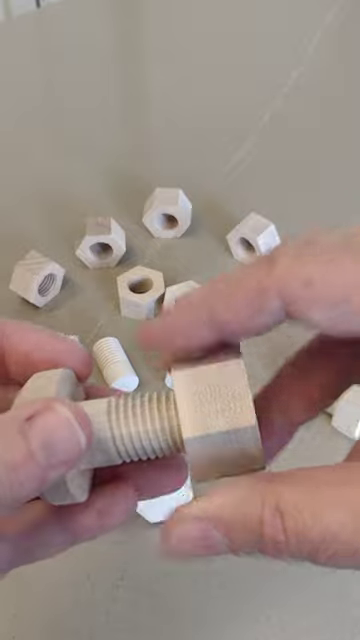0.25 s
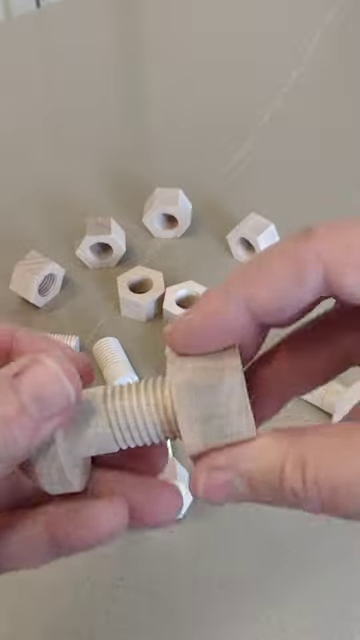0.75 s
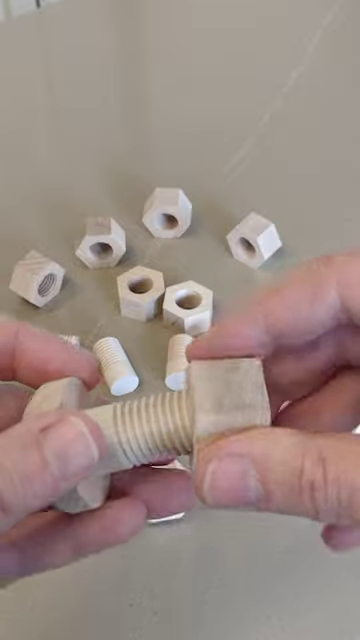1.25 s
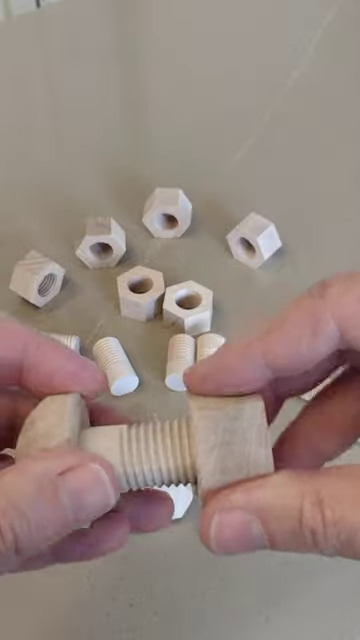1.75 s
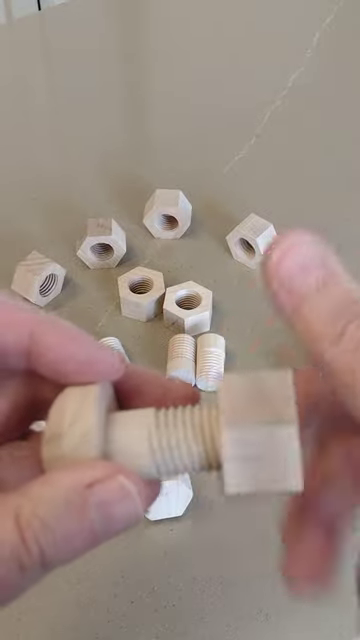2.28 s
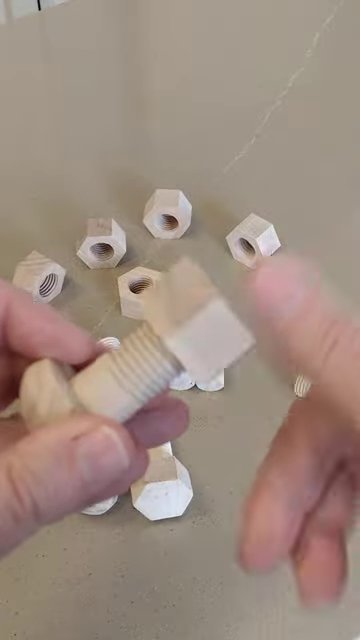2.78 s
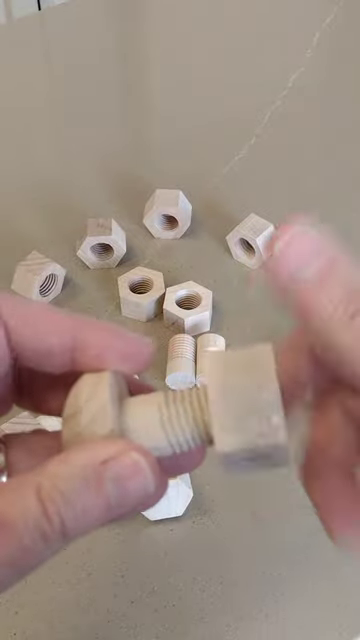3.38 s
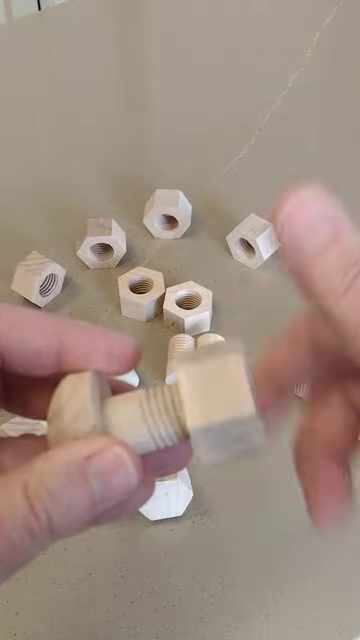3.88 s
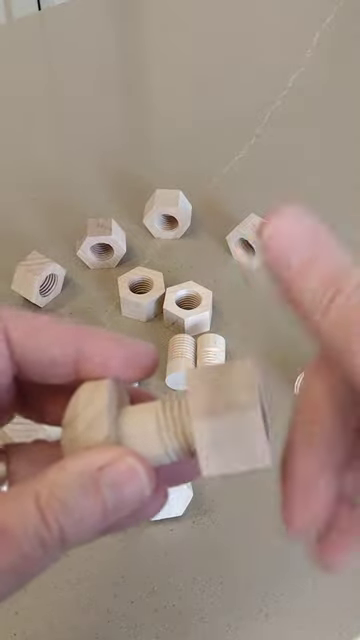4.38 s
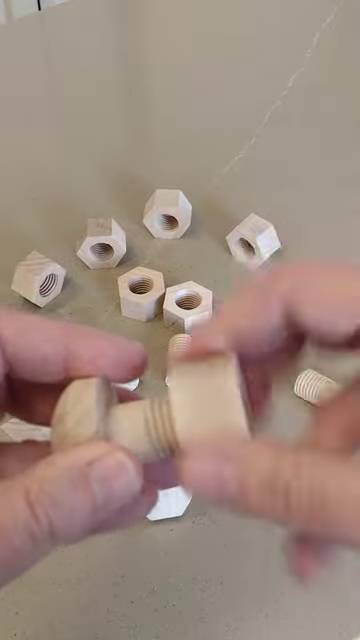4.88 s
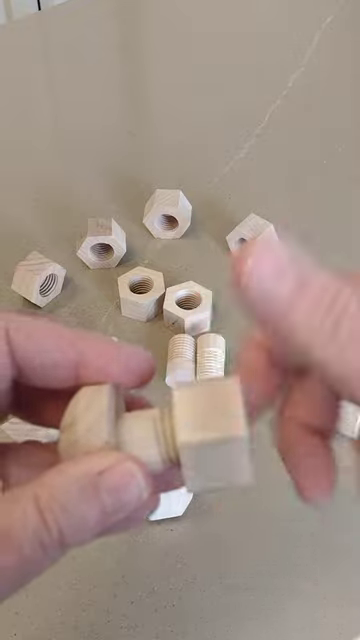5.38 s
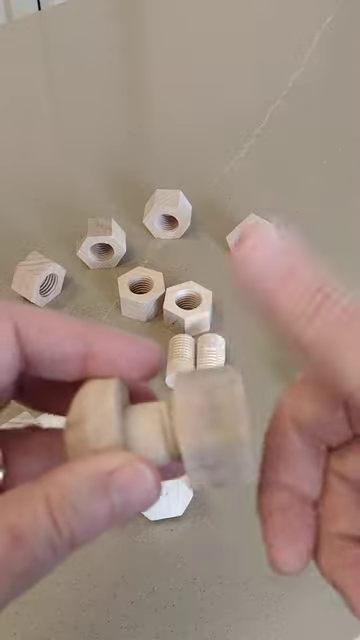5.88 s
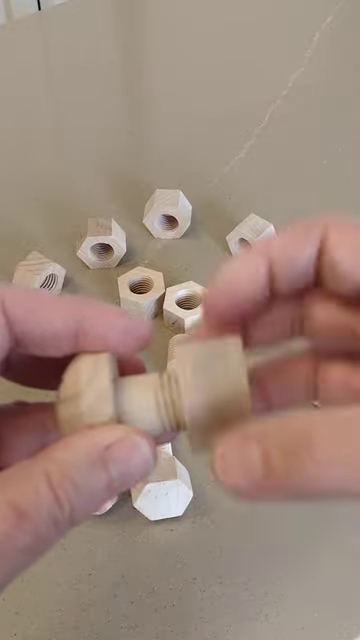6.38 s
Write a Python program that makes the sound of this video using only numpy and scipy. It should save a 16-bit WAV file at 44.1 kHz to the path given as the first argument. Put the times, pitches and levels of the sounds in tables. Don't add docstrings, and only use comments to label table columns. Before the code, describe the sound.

Soft finger rubs on wood give way to sharp, irregular wooden clacks and a tiny thread squeak, close up, with quiet motor hum.

```python
import sys
import numpy as np
from scipy import signal
from scipy.fft import rfft, irfft
from scipy.io import wavfile
from scipy.ndimage import uniform_filter1d

SR = 44100
rng = np.random.default_rng(int(sys.argv[2]) if len(sys.argv) > 2 else 0)


def dump(signal):
    limited = np.clip(np.atleast_2d(signal).T, -1, 1)
    pcm = np.round(limited * 32767).astype(np.int16)
    wavfile.write(sys.argv[1], SR, pcm)


def boost_factor(decibels):
    exponent = np.asarray(decibels, float) / 20
    return 10 ** exponent


N = 293265

# pitch_hz, density_db (per Hz)
AIR_SPECTRUM = [(15, -53.5), (25, -17.5), (64, -12), (112, -2.5), (174, -9.5), (275, -5.5), (416, -12),
                (570, -20), (628, -16), (1500, -22), (3590, -24), (7430, -31), (8190, -21), (10600, -63),
                (18000, -120)]
# pitch_hz, level_db (rms)
HUM_TONES = [(120, -74.5), (237, -80.5), (274, -78), (296, -82.5), (355, -79.5), (415, -78.5), (474, -85),
             (533, -90), (637, -87.5), (950, -88)]
RUMBLE_DB, HISS_DB = -75, -76
RUMBLE_LOW_HZ, SPLIT_HZ = 36.2, 493
OPEN_FROM_DB, OPEN_SLOPE, OPEN_MOST_DB, OPEN_HOLD_S = -64.5, 0.14, 7, 0.067

# pitch_hz, t60_s, level_db
ROOM_BANDS = [(700, 0.43, -9.5), (1200, 0.26, 1.5), (2000, 0.27, -2.5), (3240, 0.17, -2.5),
              (4470, 0.22, -1.5), (5560, 0.33, 2), (8050, 0.063, -12)]
ROOM_DB, ROOM_RISE_S, ROOM_GAP_S = -16, 0.021, 0.001
LATE_DB, LATE_STRETCH = -18, 4.66
ECHO_SPREAD_DB, ECHO_RATE_HZ = 2.5, 200

# start_s, length_s, first_hz, last_hz, level_db
CHIRPS_OF_THREAD = [(0.075, .03, 1930, 2455, -68), (0.169, .04, 2480, 2530, -63),
                    (0.28, 0.05, 3240, 3370, -65.5), (0.506, 0.034, 3330, 3370, -67.5),
                    (1.125, 0.035, 1630, 1750, -68), (2.044, 0.044, 2260, 2480, -62.5),
                    (2.269, 0.02, 1100, 1290, -57), (2.845, 0.024, 1906, 2200, -53),
                    (3.175, .03, 1200, 1200, -57), (4.776, 0.34, 1288, 1313, -64),
                    (6.04, 0.029, 925, 1180, -58), (6.074, 0.01, 1660, 1780, -50)]
# start_s, length_s, first_hz, last_hz, level_db
FIBRE_WHISTLES = [
    (2.568, 0.014, 1610, 934, -45),
    (2.5712, 0.013, 2370, 2405, -26),
    (3.377, .015, 2490, 2200, -38.5),
    (2.087, 0.018, 2450, 2000, -62),
    (2.868, 0.033, 2450, 2590, -54.5),
    (4.739, 0.027, 2504, 2510, -50),
    (5.871, 0.039, 2370, 2370, -61.5),
    (5.92, 0.039, 2367, 2370, -66),
]
CHIRP_ROUGH, WHISTLE_ROUGH = 0.75, 0.15

# time_s, slips_per_s, level_db, overtone_loss_db
SQUEAK_PATH = [
    (3.6241, 2430, -65, 27),
    (3.627, 2050, -34.5, 37),
    (3.632, 2000, -30, 22),
    (3.636, 1810, -26.5, 2),
    (3.638, 1270, -33.5, -2.5),
    (3.643, 1120, -38, -5),
    (3.648, 760, -58, -16.5),
    (3.656, 1120, -48.5, -2),
]
SQUEAK_ROUGH_DB = 2.5

# start_s, length_s, wood_db, skin_hiss_db
FINGER_RUBS = [(0.076, 0.022, -76, -74), (0.145, 0.069, -76, -72.5), (0.518, 0.017, -90, -81),
               (0.547, 0.11, -75, -72), (0.67, 0.12, -75.5, -70.5), (0.77, 0.16, -83, -78),
               (1.025, 0.296, -82.5, -77), (1.427, 0.07, -80, -72.5), (1.677, 0.07, -77.5, -74),
               (1.871, 0.056, -74, -68), (1.954, 0.23, -75, -76.5), (2.175, 0.12, -69.5, -72.5),
               (2.546, 0.039, -67.5, -67), (2.814, 0.09, -63.5, -59), (3.075, 0.12, -63.5, -63),
               (3.386, 0.046, -59, -64.5), (3.427, 0.084, -65, -79), (3.844, 0.13, -54.5, -61.5),
               (4.133, 0.058, -57.5, -61), (4.397, 0.15, -45, -51), (4.694, 0.11, -54.5, -56.5),
               (4.961, 0.075, -59.5, -61), (5.263, 0.091, -49.5, -58), (5.339, 0.042, -51, -80),
               (5.653, 0.073, -65.5, -62), (6.046, 0.05, -72, -68), (6.076, 0.072, -51.5, -56),
               (6.313, 0.038, -50.5, -67), (6.393, 0.056, -52.5, -62.5), (6.478, 0.01, -65, -53.5)]
# start_s, length_s, wood_tone_hz, wood_db, hiss_db (re wood)
THREAD_JAMS = [(2.574, 0.01, 2770, -38.5, -28), (3.377, 0.02, 2320, -44, -28),
               (3.640, 0.0155, 2900, -29.5, -16), (4.1882, .0075, 2900, -31, -21),
               (4.4662, 0.0097, 3100, -24.5, -12), (5.025, 0.011, 2840, -27.5, -22),
               (5.7247, 0.012, 2720, -38, -21.5), (6.388, 0.017, 2780, -34.5, -30),
               (6.421, 0.005, 2200, -41.5, -25), (6.433, 0.0068, 2690, -42, -22),
               (6.4448, 0.012, 2900, -29, -18.5), (6.616, 0.0075, 2500, -47, -25)]
RUB_HZ, RUB_HZ_PER_DB = 3150, 11.5
RUB_PATCHY_DB, GRAIN_SPREAD_DB = 2.5, 2.2
SWELL_SHARE, LET_GO_S = 0.67, 0.022

# pitch_hz, level_db, t60_s
WOOD_MODES = [(1730, 4, 0.0098), (2200, 6, 0.0056), (2588, 2.5, 0.0097), (3220, -2, 0.011),
              (3640, 3, 0.011), (4130, 11.5, 0.0023), (4824, -0.5, 0.01), (5270, 2.5, 0.0035)]
# pitch_hz, level_db, t60_s
EDGE_MODES = [(5340, 5, 0.0004), (6364, -4, 0.0037), (8100, -11, 0.0024)]
# pitch_hz, level_db, t60_s
BODY_MODES = [(1100, 0, 0.0037), (1540, -2, 0.0035)]
TONE_WIDTH_OCT = 0.44
CONTACT_S, MODE_SPREAD_DB = 0.00024, 1.5
BOUNCE_S, BOUNCE_DB, LEAD_S = 0.00118, -6.5, 0.0008936
ALL_ROUND_DB, ALL_ROUND_BLUR = 2, 0.44
# time_s, peak_db, wood_tone_hz, edge_db (re peak)
HARD_SLAPS = [(1.907, -23.5, 2650, -28), (2.5795, -19.5, 2500, -27), (2.6064, -10.5, 2820, -20),
              (3.164, -18, 2900, -24.5), (3.3888, -24, 2390, -28), (3.6528, -13.5, 2710, -20.5),
              (3.6883, -23.5, 2630, -22.5), (3.8769, -22, 2440, -31.5), (3.922, -11.5, 3150, -20.5),
              (3.9282, -19.5, 2300, -31), (4.1814, -22.5, 2470, -17.5), (4.1894, -4, 3460, -16),
              (4.1942, -10.5, 2780, -28), (4.4518, -21, 2760, -36), (4.4677, -1.5, 3520, -7),
              (4.4705, -17, 2620, -21.5), (4.4735, -10.5, 3290, -4.5), (4.7988, -23, 2900, -26.5),
              (5.0302, -6, 3310, -19.5), (5.0335, -9, 3000, -10), (5.0362, -15, 2950, -12.5),
              (5.3258, -13.5, 3330, -21.5), (5.329, -18.5, 2940, -15), (5.7262, -21.5, 2860, -26.5),
              (5.729, -13, 3330, -18.5), (6.3176, -22.5, 2540, -8), (6.334, -24.5, 3400, -31),
              (6.3908, -17, 2970, -24.5), (6.4005, -15.5, 2640, -25), (6.4505, -8, 3010, -25)]
# time_s, peak_db, wood_tone_hz, body_db (re peak)
ROCKING_TAPS = [(0.969, -45.5, 2640, -5.5), (2.3187, -47.5, 2300, -1.5), (2.6104, -21, 2430, -9.5),
                (2.8438, -39.5, 2720, -26), (3.148, -30, 2400, -25), (3.177, -31, 2570, -29),
                (3.3863, -29, 2590, -30.5), (3.4256, -30.5, 2250, -9), (3.4646, -38, 2600, -14),
                (3.6081, -35.5, 2550, -12.5), (3.8667, -34.5, 2530, -13), (3.9103, -34.5, 2510, -1.5),
                (3.9711, -25.5, 2830, -16.5), (3.989, -36.5, 2830, -14.5), (4.1519, -27.5, 2640, -16.5),
                (4.716, -36, 2580, -21), (4.7783, -26.5, 2740, -19), (4.9869, -38, 2290, -0.5),
                (5.0025, -28.5, 2660, -18), (5.0216, -24, 3630, -14.5), (5.2832, -34.5, 2900, -3),
                (5.3666, -32, 3300, -3), (5.6813, -33.5, 2500, -11.5), (5.7336, -26, 3050, -18.5),
                (5.753, -31, 2230, -4), (6.0851, -37.5, 1940, -8), (6.1207, -27.5, 2480, -6.5),
                (6.3215, -32, 2240, -2.5), (6.483, -25.5, 2700, -13), (6.6194, -37.5, 2500, -2.5)]
# time_s, peak_db
THREAD_TICKS = [(0.5953, -53), (0.602, -50.5), (0.65, -57), (1.916, -42), (2.2555, -51.5), (2.27, -46.5),
                (2.282, -50), (2.8598, -43), (2.887, -49.5), (2.917, -46.5), (3.1254, -48), (3.1528, -37),
                (3.3756, -39.5), (3.476, -44.5), (3.874, -27.5), (3.941, -25.5), (4.4195, -49.5),
                (4.4268, -34), (4.4325, -38.5), (5.2867, -35.5), (5.3098, -40), (5.3765, -34), (5.39, -39),
                (5.679, -39.5), (5.724, -27.5), (6.0413, -50), (6.057, -47.5), (6.1854, -41), (6.2022, -47),
                (6.3467, -37)]
# time_s, peak_db
NAIL_TICKS = [
    (2.418, -67),
    (2.822, -57),
    (2.8853, -42.5),
    (3.102, -61),
    (5.575, -58),
    (6.161, -59),
]
NAIL_HZ, NAIL_EDGE_DB = 4300, 0
TICK_HZ, TICK_HZ_PER_DB, LIGHT_EDGE_DB = 2900, 10.5, -27.5
BODY_DB, BODY_FULL_HZ, BODY_LOSS_DB_PER_KHZ = -17.5, 2650, 32

MIC_LOW_HZ, CUTOFF_HZ, OVERLOAD = 1050, 8460, 0.97


def rms_one(x):
    return x / np.sqrt(np.mean(x ** 2) + 1e-20)


def at_hz(points, hz, column):
    points = np.array(points)
    return np.interp(np.log(hz), np.log(points[:, 0]), points[:, column])


def filtered(x, order, edge_hz, kind):
    return signal.sosfilt(signal.butter(order, edge_hz, kind, fs=SR, output="sos"), x)


def coloured(spectrum_db, lowest_hz=10):
    hz = np.maximum(np.fft.rfftfreq(N, 1 / SR), lowest_hz)
    return rms_one(irfft(rfft(rng.standard_normal(N)) * boost_factor(spectrum_db(hz)), N))


def drift(rate_hz):
    return coloured(lambda hz: -30 * np.log10(1 + (hz / rate_hz) ** 2), lowest_hz=.1)


def background():
    air = coloured(lambda hz: at_hz(AIR_SPECTRUM, hz, 1))
    rumble = rms_one(filtered(air, 4, [RUMBLE_LOW_HZ, SPLIT_HZ], "band"))
    hiss = rms_one(filtered(air, 4, SPLIT_HZ, "high"))
    waver = drift(rate_hz=2.5)
    hum = np.zeros(N)
    for k, (hz, level_db) in enumerate(HUM_TONES):
        loudness = boost_factor(level_db + 2.0 + 0.64 * np.roll(waver, 9001 * k))
        pitch_hz = hz + 1.076 * np.roll(waver, -17003 * k)
        hum += loudness * np.sin(2 * np.pi * np.cumsum(pitch_hz) / SR + k)
    return boost_factor(RUMBLE_DB) * rumble + hum + boost_factor(HISS_DB) * hiss


def opening(sound):
    power = uniform_filter1d(sound ** 2, round(OPEN_HOLD_S * SR))
    level_db = 10 * np.log10(np.maximum(power, 1e-12))
    return boost_factor(np.clip(OPEN_SLOPE * (level_db - OPEN_FROM_DB), 0, OPEN_MOST_DB))


def room(x):
    t = np.arange(SR) / SR
    edges = 500 * 2 ** np.arange(0, 4.3, .5)
    response = np.zeros(SR)
    for low, high in zip(edges, edges[1:]):
        band = filtered(rng.standard_normal(SR), 2, [low, high], "band")
        hz = np.sqrt(low * high)
        fall_db = 60 * t / at_hz(ROOM_BANDS, hz, 1)
        decay = boost_factor(-fall_db) + boost_factor(LATE_DB - fall_db / LATE_STRETCH)
        response += band * boost_factor(at_hz(ROOM_BANDS, hz, 2)) * decay
    response *= 1 - np.exp(-np.maximum(t - ROOM_GAP_S, 0) / ROOM_RISE_S)
    response *= boost_factor(ECHO_SPREAD_DB * drift(ECHO_RATE_HZ)[:SR] * np.exp(-t / 0.11))
    response /= np.sqrt(np.sum(response ** 2))
    return boost_factor(ROOM_DB) * signal.fftconvolve(x, response)[:N]


def chirps():
    out = np.zeros(N)
    blur = (drift(rate_hz=190) + 1j * drift(rate_hz=150)) / np.sqrt(2)
    for rows, rough in ((CHIRPS_OF_THREAD, CHIRP_ROUGH), (FIBRE_WHISTLES, WHISTLE_ROUGH)):
        for s, length, first_hz, last_hz, level_db in rows:
            i, n = round(s * SR), round(length * SR)
            line = np.exp(2j * np.pi * np.cumsum(np.linspace(first_hz, last_hz, n)) / SR)
            slip = np.real((1 - rough + rough * blur[i:i + n]) * line)
            out[i:i + n] += boost_factor(level_db) * signal.windows.tukey(n, .6) * slip
    return out


def squeak():
    s, *columns = np.transpose(SQUEAK_PATH)
    t = np.arange(s[0], s[-1], 1 / SR)
    slips_per_s, level_db, loss_db = [np.interp(t, s, c) for c in columns]
    turns = np.cumsum(slips_per_s) / SR
    flutter_db = SQUEAK_ROUGH_DB * drift(rate_hz=440)[:6 * len(t)].reshape(6, -1)
    wave = np.zeros(len(t))
    for k in range(1, 6):
        above = min(k - 1, 2)
        damping_db = -12.0 * np.maximum(np.log2(k * slips_per_s / 3600), 0)
        overtone_db = flutter_db[k] * above + damping_db * k / 2 - loss_db * above
        wave += boost_factor(overtone_db) * np.sin(2 * np.pi * k * turns + k * k)
    out = np.zeros(N)
    out[round(s[0] * SR):][:len(t)] = boost_factor(level_db) * wave
    return out


def tone_db(hz, centre_hz):
    return -6.0 * (np.log2(hz / centre_hz) / TONE_WIDTH_OCT) ** 2


def ring(clicks, hz, t60):
    r, w = boost_factor(-60 / (t60 * SR)), 2 * np.pi * hz / SR
    return signal.lfilter([0, np.sin(w)], [1, -2 * r * np.cos(w), r * r], clicks + 1e-18)


def rubs():
    sizes = boost_factor(GRAIN_SPREAD_DB * np.minimum(rng.exponential(1, N), 4)) * rng.choice([-1, 1], N)
    grains = rms_one(sizes * (rng.random(N) < 5000 / SR))
    dealt = [(-1) ** k * grains * rng.normal(1, 0.94, N) for k in range(len(WOOD_MODES))]
    skin = coloured(lambda hz: -9.0 * np.log2(hz / 7000) ** 2 + 2.0 / (1 + ((hz - 7500) / 1200) ** 2))
    skin *= boost_factor(RUB_PATCHY_DB * drift(rate_hz=25))
    strokes = [(s, length, RUB_HZ + RUB_HZ_PER_DB * db, db, skin_db)
               for s, length, db, skin_db in FINGER_RUBS]
    strokes += [(s, length, hz, db, db + hiss_db) for s, length, hz, db, hiss_db in THREAD_JAMS]
    out = np.zeros(N)
    for s, length, centre_hz, wood_db, skin_db in strokes:
        i, n, tail = round(s * SR), round(length * SR), 600
        span = slice(i, i + n + tail)
        t = np.arange(n) / SR
        swell_s = length * np.clip(length / 0.08, .35, SWELL_SHARE)
        let_go_s = min(LET_GO_S, 0.27 * length)
        shape = np.clip(np.minimum(t / swell_s, (length - t) / let_go_s), 0, 1)
        stroke = np.pad(np.sin(np.pi / 2 * shape) ** 2, (0, tail))
        body = np.zeros(n + tail)
        for catches, (hz, level_db, t60) in zip(dealt, WOOD_MODES):
            mode_db = level_db + tone_db(hz, centre_hz) * 0.48
            body += boost_factor(mode_db) * ring(stroke * catches[span], hz, t60)
        out[span] += boost_factor(wood_db) * rms_one(body) + boost_factor(skin_db) * stroke * skin[span]
    return out


def contacts():
    def body(hz):
        return BODY_DB - BODY_LOSS_DB_PER_KHZ * max(hz - BODY_FULL_HZ, 0) / 1000

    slaps = [(s, db, hz, edge, body(hz)) for s, db, hz, edge in HARD_SLAPS]
    taps = [(s, db, hz, LIGHT_EDGE_DB, low) for s, db, hz, low in ROCKING_TAPS]
    ticks = [(s, db, TICK_HZ + TICK_HZ_PER_DB * db, LIGHT_EDGE_DB, BODY_DB) for s, db in THREAD_TICKS]
    nail = [(s, db, NAIL_HZ, NAIL_EDGE_DB, body(NAIL_HZ)) for s, db in NAIL_TICKS]
    return slaps + taps + ticks + nail


def struck(modes, extra_db):
    hz, level_db, t60 = np.transpose(modes)[:, :, None]
    t = np.arange(800) / SR
    signs = (-1.) ** np.arange(len(modes))[:, None]
    decay = boost_factor(level_db + extra_db[:, None] - 60 * t / t60)
    wave = np.sum(signs * decay * np.sin(2 * np.pi * hz * t), axis=0)
    wave *= 1 - np.exp(-(t / CONTACT_S) ** 2)
    return wave / np.abs(wave).max()


def knocks():
    out = np.zeros((2, N + 1000))
    wood, edge, low_body = [np.array(modes) * [1, 1, ALL_ROUND_BLUR]
                            for modes in (WOOD_MODES, EDGE_MODES, BODY_MODES)]
    wood_hz = np.array(WOOD_MODES)[:, 0]
    for (s, peak_db, centre_hz, edge_db, body_db), chance in zip(contacts(), rng.standard_normal((120, 16))):
        spread_db = MODE_SPREAD_DB * chance
        colour_db = tone_db(wood_hz, centre_hz)
        tone = struck(WOOD_MODES, colour_db + spread_db[:8])
        wave = tone + boost_factor(edge_db) * struck(EDGE_MODES, spread_db[8:11])
        wave += boost_factor(body_db) * struck(BODY_MODES, spread_db[11:13])
        around = struck(wood, colour_db) + boost_factor(edge_db) * struck(edge, np.zeros(3))
        around += boost_factor(body_db) * struck(low_body, np.zeros(2))
        i = round((s - LEAD_S) * SR)
        both = np.array([wave, boost_factor(ALL_ROUND_DB) * around])
        out[:, i:i + 800] += boost_factor(peak_db) * np.sign(chance[13]) * both
        later = i + round(np.clip(BOUNCE_S * boost_factor(2.5 * chance[14]) * SR, 10, 190))
        out[0, later:later + 800] += boost_factor(peak_db + BOUNCE_DB + 2.0 * chance[15]) * tone
    return out[:, :N]


def scene():
    wood = knocks() + rubs() + squeak() + chirps()
    direct, around = filtered(wood, 5, MIC_LOW_HZ, "high")
    heard = direct + room(around)
    return (heard + opening(heard) * background())[None]


def roll_off(x):
    return signal.sosfilt(signal.butter(12, 8340, fs=SR, output="sos"), x)


def record(dry):
    rounded = dry / (1 + (dry / OVERLOAD) ** 16) ** (1 / 16)
    steep = signal.cheby2(10, 56, CUTOFF_HZ * 1.092, fs=SR, output="sos")
    mix = signal.sosfilt(steep, rounded)
    return roll_off(mix)


dry = scene()
out = record(dry)
dump(out)
```